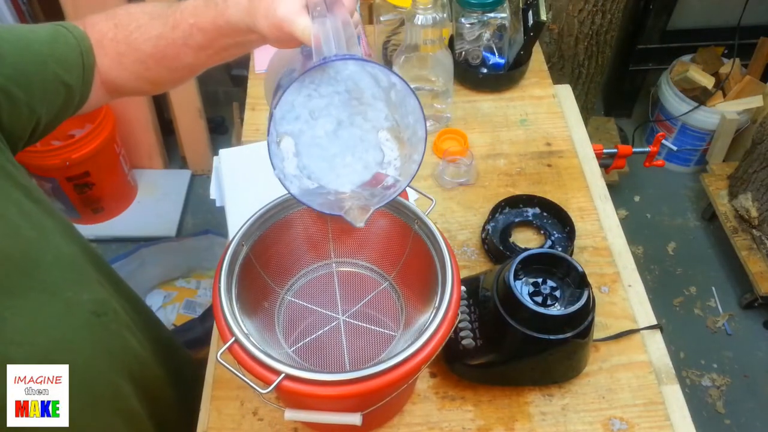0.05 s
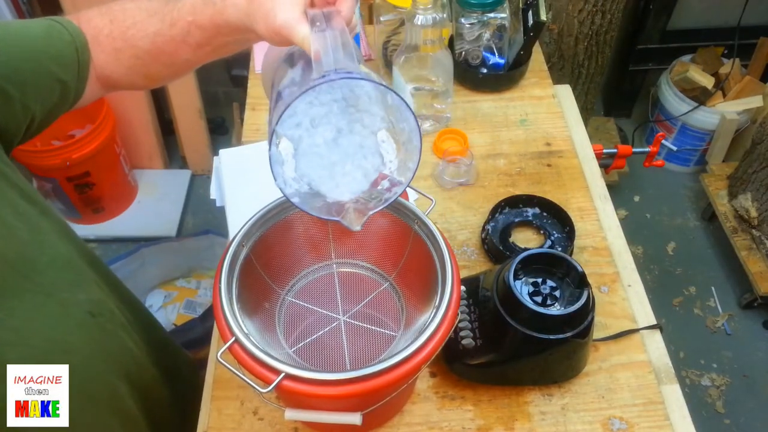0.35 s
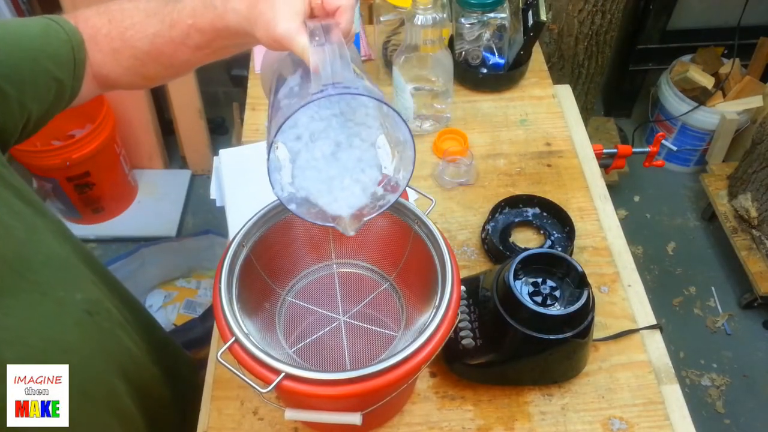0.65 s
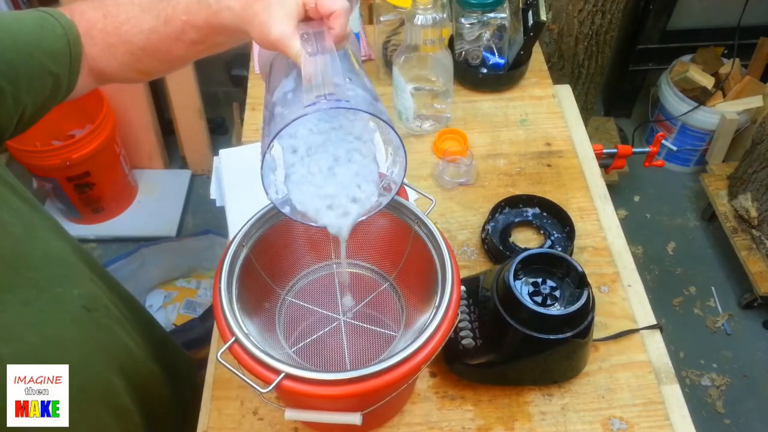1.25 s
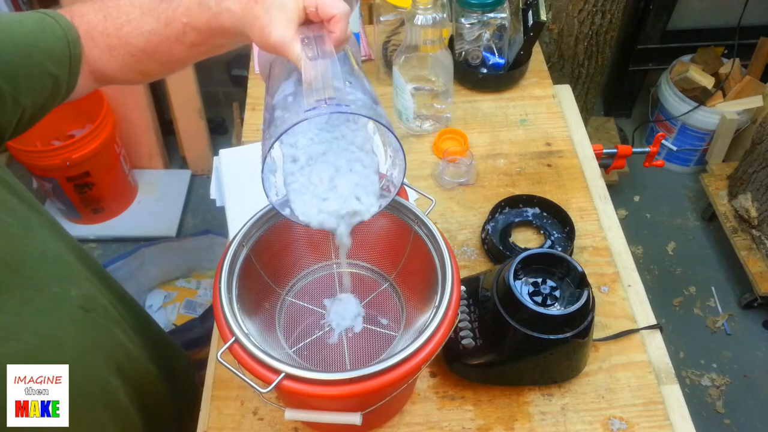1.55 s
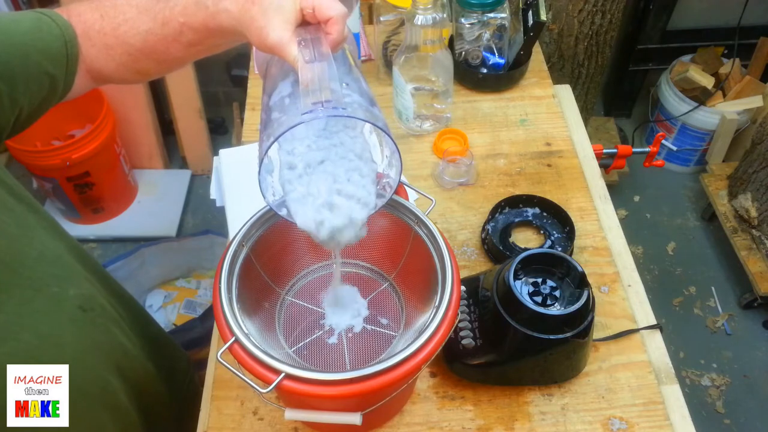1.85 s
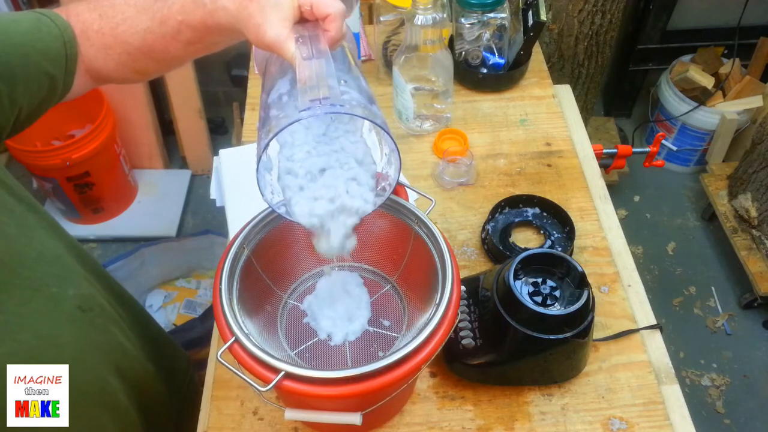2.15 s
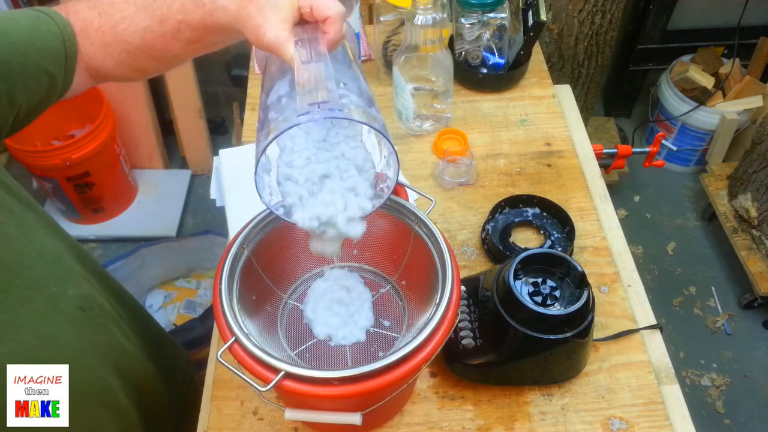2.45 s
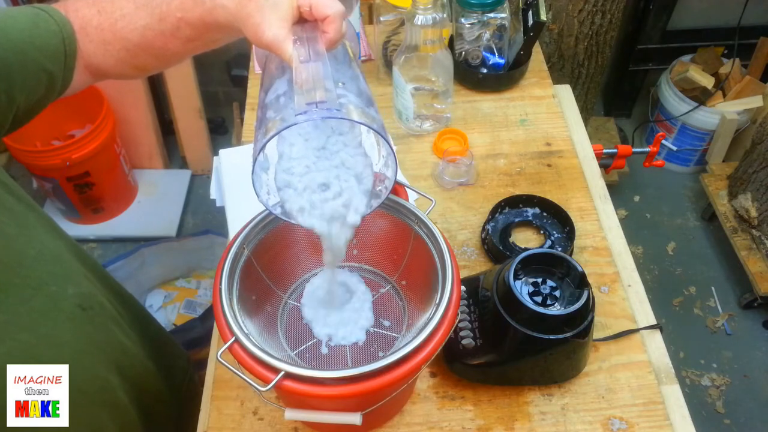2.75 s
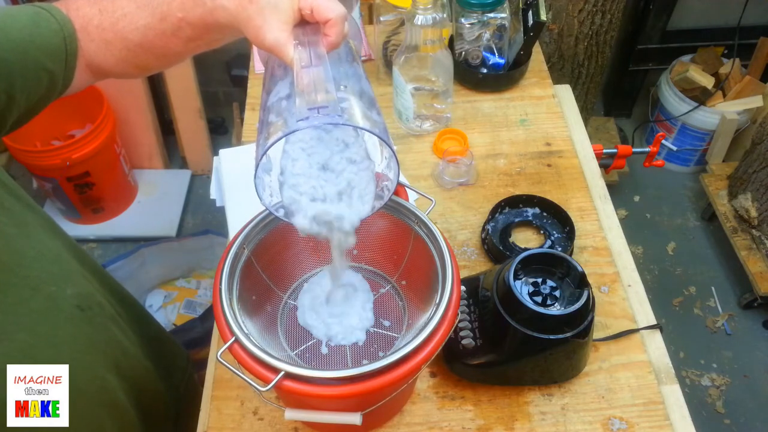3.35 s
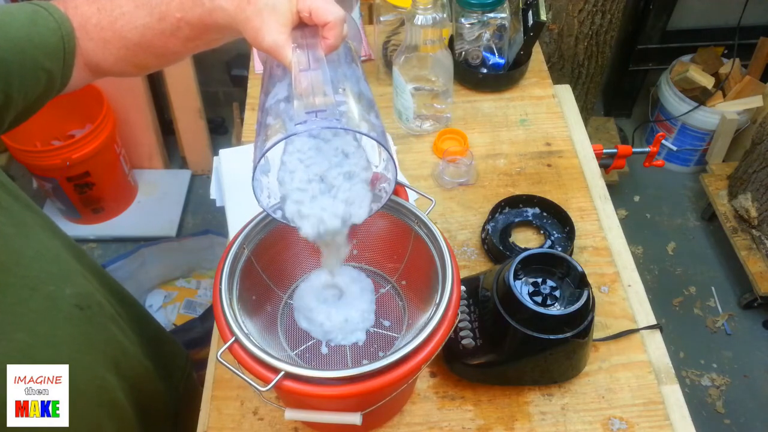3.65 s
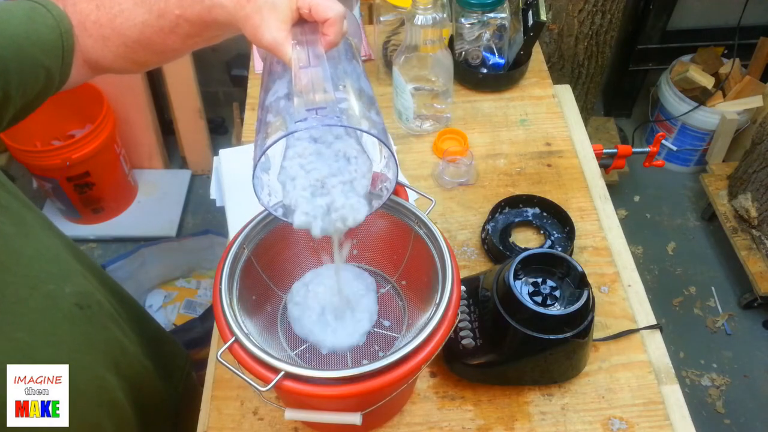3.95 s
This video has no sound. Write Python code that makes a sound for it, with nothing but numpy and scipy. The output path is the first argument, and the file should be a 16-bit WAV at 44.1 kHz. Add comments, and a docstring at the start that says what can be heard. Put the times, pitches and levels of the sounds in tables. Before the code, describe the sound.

Watery pulp pours into a strainer over a plastic bucket, heard up close in a quiet workshop. From about 0.3 seconds it slithers faintly along a jar. Soft squelches and single drips begin between 1.1 and 1.4 seconds. A lump lands with a hollow thump near 2.1 seconds. From 2 to 4 seconds, draining water spatters unevenly into the bucket among more wet plops and a few tiny plips.

```python
"""A soft, wet slither in a quiet workshop: watery paper pulp slides along a tilted jar.
It tips into a mesh strainer on a plastic bucket, where lumps squelch and thump the air below.
Water drains through and ticks on the wet bottom, first in single drops, then as a spattering trickle,
and the odd air pocket plips in the pulp. Heard up close, through two microphone ports."""
import sys
import numpy as np
from scipy import signal
from scipy.fft import rfft, irfft
from scipy.io import wavfile
from scipy.ndimage import uniform_filter1d

SR = 44100
rng = np.random.default_rng(int(sys.argv[2]) if len(sys.argv) > 2 else 0)


def wav_out(sig):
    """Save sig, one row per channel (or a flat mono array), as 16-bit PCM at SR to the path in sys.argv[1]."""
    wavfile.write(sys.argv[1], SR, np.round(np.clip(np.atleast_2d(sig).T, -1, 1) * 32767).astype(np.int16))


N = 176400


def undb(db):
    return 10 ** (np.asarray(db) / 20)


def unit(x):
    """Scale to rms 1."""
    return x / np.sqrt(np.mean(x ** 2) + 1e-18)


def add(out, x, start):
    """Mix x into out from a start time in seconds."""
    i = max(int(start * SR), 0)
    out[..., i:i + x.shape[-1]] += x[..., :N - i]


def convolve(x, h):
    return signal.fftconvolve(x, h)[:len(x)]


def bin_hz(size):
    return np.arange(size // 2 + 1) * SR / size


def colour(x, points, size=2048):
    """Minimum-phase EQ through (Hz, dB) points."""
    hz, db = np.array(points, float).T
    curve_db = np.interp(np.log(np.maximum(bin_hz(size), 1)), np.log(hz), db)
    cepstrum = irfft(np.log(undb(curve_db)))
    cepstrum[1:size // 2] *= 2
    cepstrum[size // 2 + 1:] = 0
    return convolve(x, irfft(np.exp(rfft(cepstrum))))


def diffuse(size, wide_hz=980):
    """Stereo noise: narrow in the bass, fully wide in the treble."""
    mid, side = rng.standard_normal((2, size))
    width = np.clip(bin_hz(size) / wide_hz, .35, 1) * np.pi / 4
    mid = irfft(rfft(mid) * np.cos(width), size)
    side = irfft(rfft(side) * np.sin(width), size)
    return np.array([mid + side, mid - side])


def clicks(per_s, spread_db):
    """Random clicks of uneven size."""
    hits = rng.random(N) < per_s / SR
    sizes = undb(spread_db * np.clip(rng.standard_normal(N), -2, 2))
    return hits * sizes * rng.choice([-1, 1], N)


def burst(decay, attack_s=0.00042):
    """Envelope of unit energy: snappy attack, exponential tail."""
    t = np.arange(SR // 4) / SR
    shape = (1 - np.exp(-t / attack_s)) * np.exp(-t / decay)
    return shape / np.linalg.norm(shape)


# Reflections in the bucket, then the workshop. Each row: relative level in dB, T60 in seconds.
REFLECTIONS = [(0, 0.023), (-3.5, 0.19), (-11, 0.093)]

def space(x, wet_db, size=16384, lag_s=0.00008):
    """Direct sound hits the right port first; bucket and room scatter a fresh tail for each spot."""
    t = np.arange(size) / SR
    power = 0
    for db, t60 in REFLECTIONS:
        fade = np.exp(-2 * np.log(1000) * t / t60)
        power = power + undb(db + wet_db) ** 2 * fade / fade.sum()
    tails = diffuse(size) * np.sqrt(power) * (1 - np.exp(-t / 0.00084))
    left = irfft(rfft(x) * np.exp(-2j * np.pi * bin_hz(len(x)) * lag_s), len(x))
    return np.array([left, x]) + np.array([convolve(x, tail) for tail in tails])


# Dark room tone with a thin whistle on top. Each row: frequency in Hz, gain in dB.
ROOM_EQ = [(60, 5.5), (120, 0), (300, -8.5), (1500, -18), (12500, -23.5), (13000, -13), (13500, -27)]

def workshop(hum_hz=120):
    """A faint bed of room tone and mains hum."""
    air = unit(np.array([colour(noise, ROOM_EQ) for noise in diffuse(N)]))
    hum = unit(np.sin(2 * np.pi * hum_hz * np.arange(N) / SR))
    return undb(-66) * air + undb(-73) * hum


# Pulp slipping in the jar. Each row: start in seconds, relative level in dB, decay in seconds.
SLITHERS = [(0.324, -29.5, 0.017), (0.488, -17, 0.027), (0.524, -20.5, 0.007), (0.745, -29, 0.025),
            (1.047, -21.5, 0.05), (1.343, -13.5, 0.0092), (1.648, -11, 0.11)]
# Soft body, scooped mids, wet sheen. Each row: frequency in Hz, gain in dB.
SLITHER_EQ = [(200, 4), (700, -5), (3000, -5), (7000, 3.5), (14000, -5)]

def jar():
    """Wet fibres crackle softly as they slip along the jar."""
    envelope = np.zeros(N)
    for start, db, decay in SLITHERS:
        add(envelope, undb(db - 9.5) * burst(decay), start)
    crackle = unit(colour(clicks(per_s=6000, spread_db=3), SLITHER_EQ))
    return space(crackle * envelope, wet_db=4)


# The hollow note of the bucket and its air. Each row: mode frequency in Hz, relative level in dB.
BUCKET_MODES = [(72, 0.5), (120, -5), (215, -9), (238, -9), (305, 6.5), (336, -3.5), (595, -9)]

def bucket(pitch_ratio, t60=0.13):
    """The bucket's low modes bloom and die away; the load of pulp shifts their pitch."""
    t = np.arange(SR // 2) / SR
    modes = sum(undb(db) * np.sin(2 * np.pi * hz * pitch_ratio * t) for hz, db in BUCKET_MODES)
    ring = modes * np.exp(-np.log(1000) * t / t60) * (1 - np.exp(-t / 0.017))
    return ring / np.linalg.norm(ring)


# Fader rides for the stream. Each row: time in seconds, spatter gain in dB, squelch gain in dB.
POUR_FADERS = [(0, -100, -110), (1.15, -90, -82.5), (1.35, -68, -57.5), (1.6, -61, -85), (1.86, -79, -68.5),
               (1.97, -44.5, -58.5), (2.06, -56, -65), (2.19, -48, -59), (2.4, -41.5, -58.5),
               (2.52, -53, -55), (2.65, -40.5, -56.5), (2.72, -54, -60), (2.83, -43.5, -56),
               (3.43, -44.5, -53.5), (3.52, -44.5, -57.5), (3.85, -37.5, -51), (4.0, -47.5, -55.5)]
SPATTER_FADER, SQUELCH_FADER = 1, 2

def pour(fader, clump_s=0.024, clump_db=5.5):
    """Gain along one fader ride, wobbling because the stream comes in clumps."""
    rows = np.array(POUR_FADERS)
    ride_db = np.interp(np.arange(N) / SR, rows[:, 0], rows[:, fader])
    hold = int(SR * clump_s)
    steps = np.repeat(2 * rng.random(N // hold + 1) - 1, hold)
    clumps = uniform_filter1d(steps, hold // 2)[:N]
    return undb(ride_db + clump_db * clumps)


# Lumps landing on the mesh. Each row: start in seconds, relative squelch and thud level in dB,
# relative bucket ring level in dB, squelch and thud decay in seconds.
LUMPS = [(1.111, -8.5, -24, 0.017), (1.394, -3, -24, 0.045), (1.515, -7.5, -24, 0.048),
         (1.683, -12.5, -14, 0.049), (1.792, 2.5, -5, 0.0074), (1.881, -5.5, -7.5, 0.014),
         (1.94, 3.5, -4, 0.04), (2.115, 12, 19.5, 0.018), (2.261, 3.5, -10, 0.042), (2.309, 0, 9.5, 0.0036),
         (2.359, 5.5, -9, 0.037), (2.57, 1.5, 1.5, 0.06), (2.64, 1, 3, 0.014), (2.886, 2, -0.5, 0.013),
         (3.056, 0.5, -18, 0.007), (3.138, 1.5, -20, 0.0071), (3.403, 7, 2, 0.035), (3.561, 5, -7, 0.047),
         (3.791, 2, -0.5, 0.015)]
# A juicy midrange for the squelch, all bass for the thud. Each row: frequency in Hz, gain in dB.
SQUELCH_EQ = [(70, 0.5), (600, -1.5), (760, -7), (1200, -3.5), (1900, -3), (2800, -7), (14000, -23.5)]
THUD_EQ = [(70, 20), (330, 10), (900, -16.5)]

def pulp(detune=0.023):
    """Lumps land with tiny wet pops and a thud that rings the bucket; the stream oozes and patters."""
    envelope, ring = np.zeros((2, N))
    for start, squelch_db, ring_db, decay in LUMPS:
        add(envelope, undb(squelch_db - 15.5) * burst(decay), start)
        pitch_ratio = 1 + detune * rng.uniform(-1, 1)
        add(ring, undb(ring_db - 16) * bucket(pitch_ratio), start)
    pops = unit(colour(clicks(per_s=2000, spread_db=1.1), SQUELCH_EQ)) * envelope
    flow = pour(SQUELCH_FADER)
    ooze = unit(colour(clicks(per_s=1000, spread_db=7), SQUELCH_EQ)) * flow * undb(5)
    patter = unit(clicks(per_s=150, spread_db=3)) * flow
    thud = colour(patter + envelope * rng.standard_normal(N), THUD_EQ)
    thump = ring + thud + convolve(patter, bucket(1 + detune)) / 2
    return space(pops, wet_db=-1.5) + space(ooze, wet_db=1.5) + space(thump, wet_db=-9)


def tick(hz, q, size, delay_s=0.000321):
    """A drop's impact rings a small bubble; little sound lies below the bubble's pitch."""
    f = bin_hz(size)
    s = 1j * f / hz
    bubble = s * s / (s * s + s / max(q, .5) + 1)
    cut = s / 0.66
    low_cut = (cut * cut / (cut * cut + cut + 1)) ** 2
    return irfft(bubble * low_cut * np.exp(-2j * np.pi * f * delay_s))


# Single drops. Each row: start in seconds, relative level in dB, bubble pitch in Hz, bubble Q.
DROPS = [(1.387, -12.5, 5450, 15), (1.5285, -10.5, 6860, 11), (1.7013, -2, 5570, 2.4),
         (1.7841, -5.5, 6900, 1.8), (1.879, 6.5, 4200, 2.5), (1.9204, 4.5, 5100, 0.51),
         (2.006, 2, 4870, 0.73), (2.0778, -3, 5140, 2.3), (2.116, -4.5, 2980, 3.2),
         (2.2783, 11, 5470, 1.72), (2.2887, 4, 6300, 2.5), (2.346, 3, 5330, 1.06), (2.408, -9, 8040, 5.7),
         (2.519, -11, 6130, 6.4), (2.5938, -21, 6800, 9.6), (2.6206, -10.5, 5420, 15),
         (2.7075, -13, 5000, 0.57), (2.7781, 8.5, 6600, 0.99), (2.883, 3.5, 5740, 1.94),
         (2.9456, -3.5, 4580, 14.3), (2.988, 7.5, 5800, 0.4), (3.1415, -6, 6650, 9.7),
         (3.2227, 0, 6000, 3.1), (3.2778, 6, 2420, 1.5), (3.3083, 3.5, 5800, 4.8), (3.3659, 3.5, 5720, 6),
         (3.4181, 6.5, 2350, 1.1), (3.4902, 9.5, 7340, 0.38), (3.563, -5, 6750, 2.6),
         (3.6085, -4.5, 4280, 6.7), (3.6754, 1.5, 2130, 3.7), (3.736, 0.5, 3300, 1.7),
         (3.7864, 7, 2500, 1.34), (3.8279, 14, 2780, 0.42), (3.8759, 12, 2760, 0.92),
         (3.899, 8.5, 2770, 0.94)]
# Takes the edge off drops and spatter. Each row: frequency in Hz, gain in dB.
TICK_EQ = [(5500, -3), (7500, -2.5), (13000, -15.5)]

def drops(size=16384, pops=3, max_gap_s=0.0036):
    """Big drops hit the bucket bottom, each on its own spot, and break into smaller, higher pops."""
    out = np.zeros((2, N))
    for start, db, hz, q in DROPS:
        splash = tick(hz, q, size)
        delays = np.cumsum(rng.random(pops)) * max_gap_s
        pitches = hz * np.exp(0.18 * abs(rng.standard_normal(pops)))
        for delay, pop_hz in zip(delays, pitches):
            splash += undb(-10) * np.roll(tick(pop_hz, q, size), int(delay * SR))
        add(out, space(undb(db - 4.5) * colour(splash, TICK_EQ), wet_db=1), start)
    return out


def spatter(spots=3, max_per_spot=200, droplets_per_s=110, centre_hz=6740):
    """Droplets ring small bubbles of scattered pitch on a few spots, over a fine fizz."""
    sharp_clicks = np.diff(clicks(per_s=720, spread_db=1.4), prepend=0)
    fizz = undb(-12) * unit(colour(sharp_clicks, TICK_EQ))
    out = space(fizz * pour(SPATTER_FADER), wet_db=-8.5)
    for _ in range(spots):
        spot = np.zeros(N)
        starts = np.cumsum(rng.exponential(size=max_per_spot)) * spots / droplets_per_s
        variations = np.clip(rng.standard_normal((max_per_spot, 3)), -2, 2)
        for start, (pitch, level, ring) in zip(starts, variations):
            if start < N / SR:
                q = 6 * 2 ** (ring / 2)
                droplet = tick(centre_hz * np.exp(0.4 * pitch), q, size=512)
                add(spot, undb(5.5 * level) / np.sqrt(q) * droplet, start)
        trickle = undb(-9.5) * unit(colour(spot, TICK_EQ))
        out += space(trickle * pour(SPATTER_FADER), wet_db=4.5)
    return out


# Little plips in the pulp. Each row: start in seconds, level in dB, starting pitch in Hz.
AIR_POCKETS = [(2.262, -32, 1740), (2.83, -33.5, 1870), (3.406, -38, 1650), (3.859, -30, 1420)]

def air_pockets(decay_cycles=3.1, glide=0.066):
    """Each air pocket bursts open and rings briefly, its pitch bending up."""
    out = np.zeros(N)
    for start, db, hz in AIR_POCKETS:
        cycles = hz * np.arange(SR // 20) / SR
        age = cycles / decay_cycles
        bend = 1 + glide * np.tanh(age / 2)
        plip = np.exp(-age) * np.sin(2 * np.pi * cycles * bend)
        add(out, undb(db) * plip, start)
    return space(out, wet_db=2)


def scene():
    """The mix: draining water and sliding pulp over the room tone."""
    return drops() + spatter() + jar() + pulp() + air_pockets() + workshop()


# The left port is warm, the right rings in the treble. Each row: frequency in Hz, gain in dB.
LEFT_PORT_EQ = [(80, 2.5), (300, 4.5), (1300, 0), (5900, 1.5), (7200, -4.5), (9000, -7), (12000, 0),
                (14400, 0.5), (15200, -22.5)]
RIGHT_PORT_EQ = [(1300, 0.5), (4400, -4), (6600, 3.5), (7300, 9.5), (8500, 4.5), (14400, 4), (15200, -14.5)]

def record(dry, low_cut_hz=90, high_cut_hz=16400):
    """Each port colours the sound; then a low cut, a clip at full scale and a steep high cut."""
    low_cut = signal.butter(2, low_cut_hz, "high", fs=SR, output="sos")
    high_cut = signal.ellip(8, .2, 70, high_cut_hz, fs=SR, output="sos")
    ports = np.array([colour(dry[0], LEFT_PORT_EQ), colour(dry[1], RIGHT_PORT_EQ)])
    clipped = np.clip(signal.sosfilt(low_cut, ports), -1, 1)
    return signal.sosfilt(high_cut, clipped)


dry = scene()
out = record(dry)
wav_out(out)
```